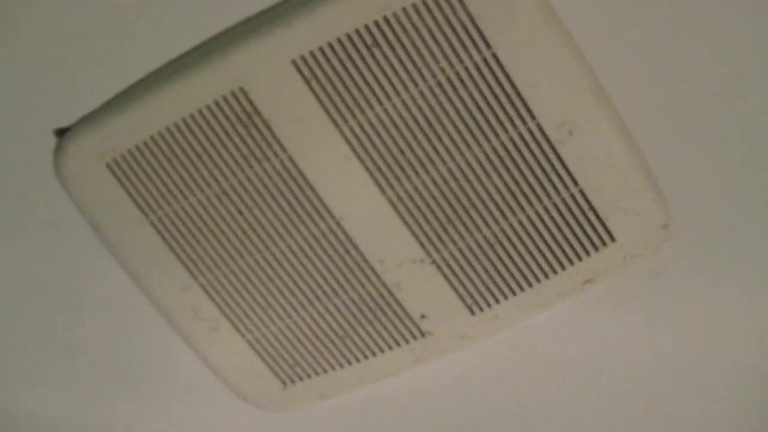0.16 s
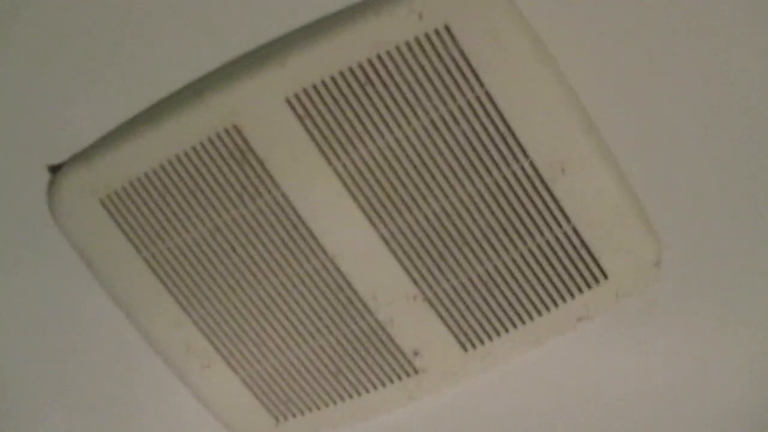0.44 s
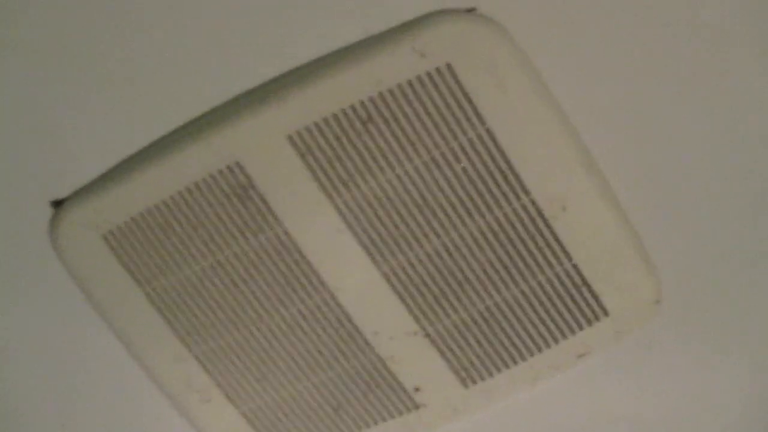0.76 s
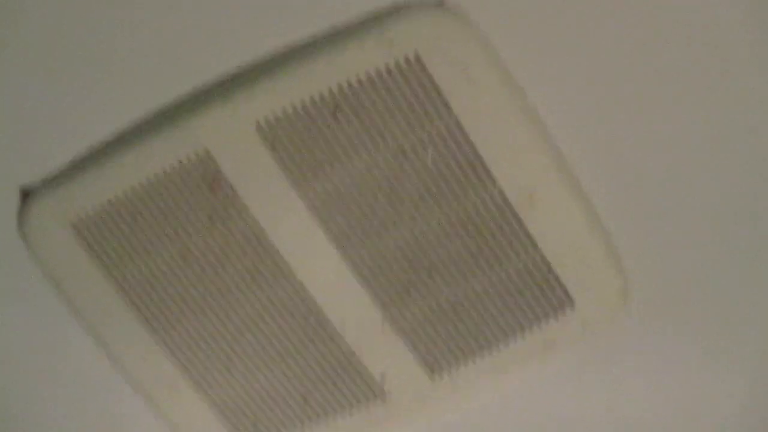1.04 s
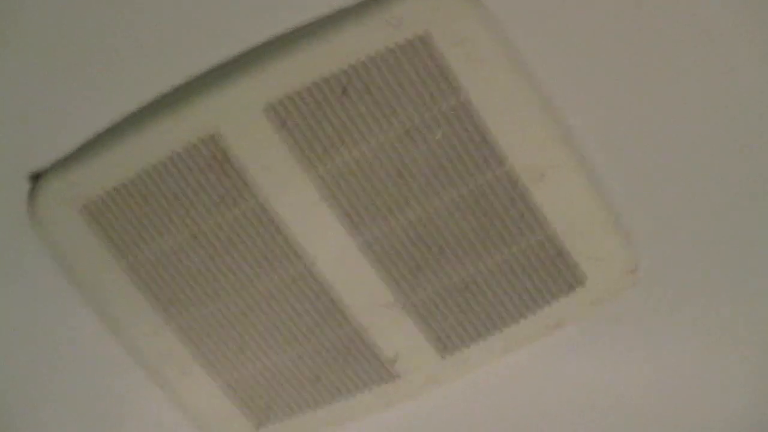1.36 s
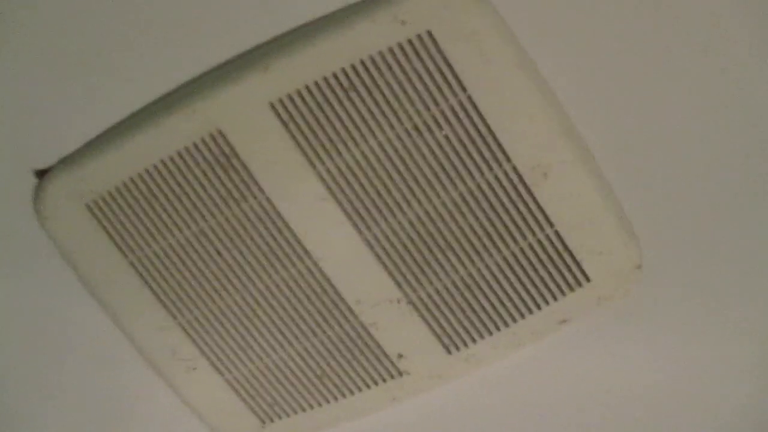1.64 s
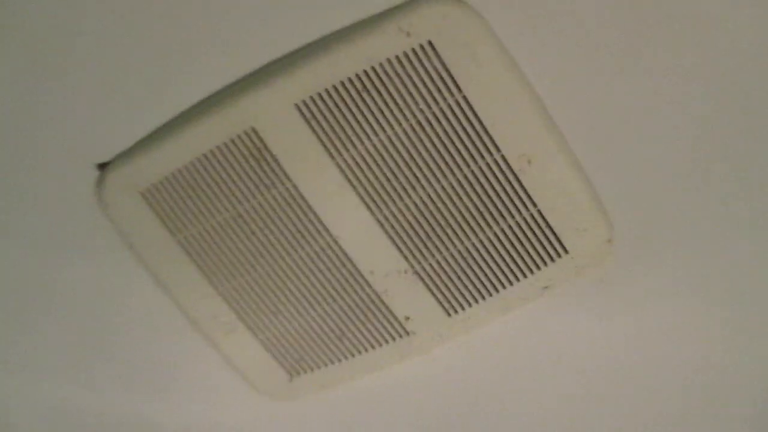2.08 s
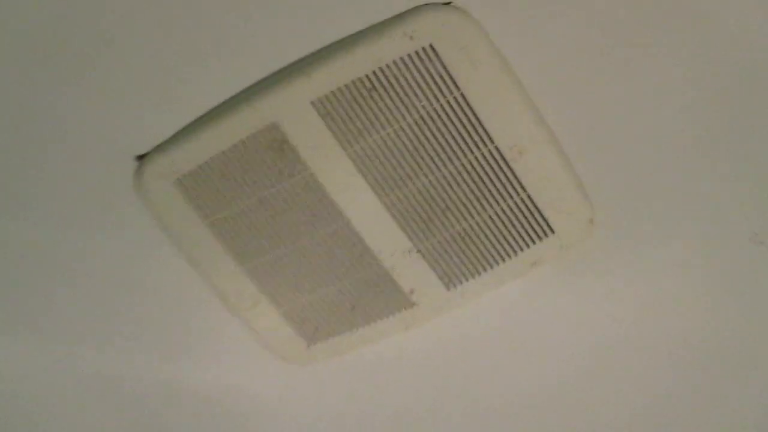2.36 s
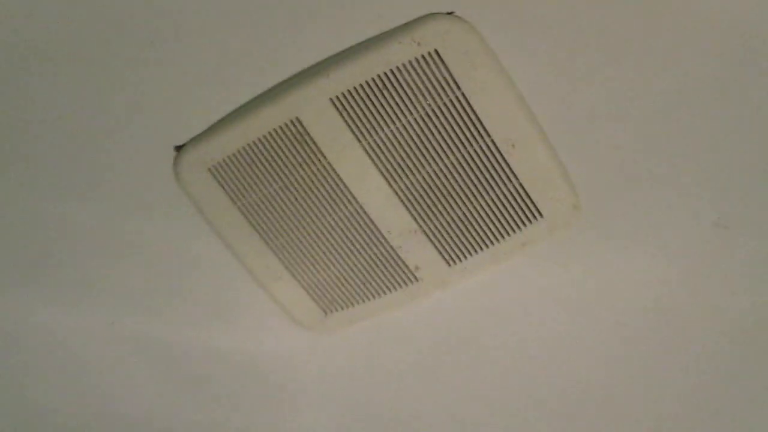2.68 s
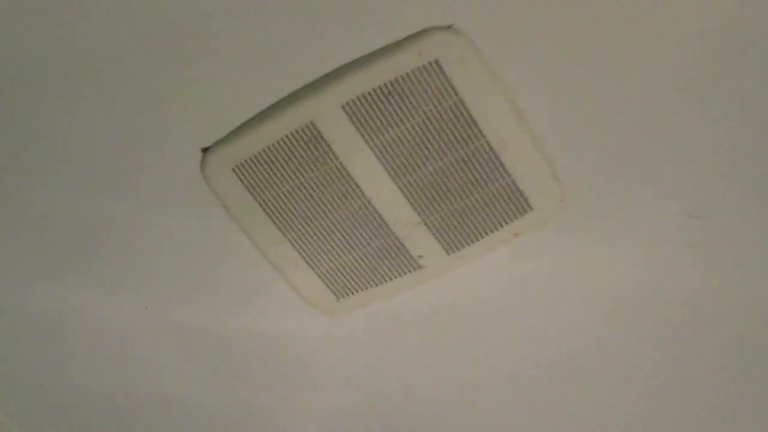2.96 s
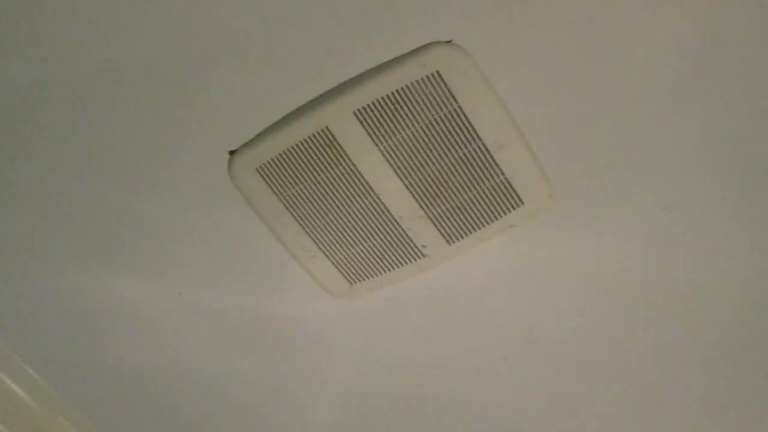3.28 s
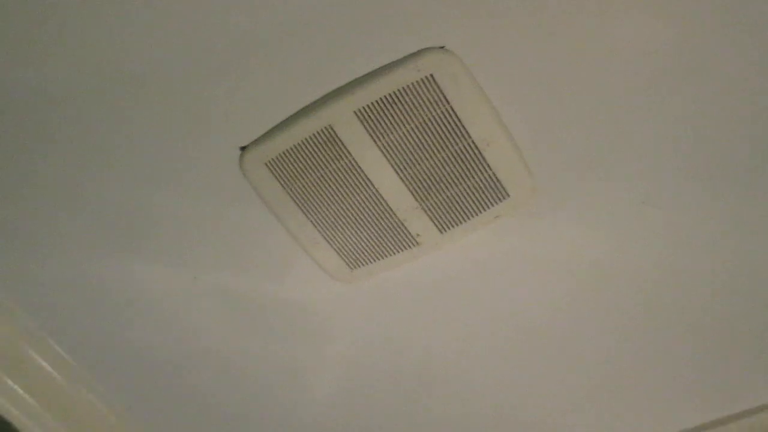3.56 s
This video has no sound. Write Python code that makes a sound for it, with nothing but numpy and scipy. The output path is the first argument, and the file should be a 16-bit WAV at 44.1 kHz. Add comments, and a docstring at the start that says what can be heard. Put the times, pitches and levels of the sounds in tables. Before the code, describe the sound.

A ceiling exhaust fan runs throughout in a small room: a strong low motor hum, a buzzing housing drone and throbbing air through the grille. Close up at first, it carries a thin ringing hiss. A faint tick at 1.1 s precedes a loud, dry plastic click at 1.25 s; the level ducks and slowly recovers. A soft rub follows at 1.35 s, small ticks around 1.55 s, and the hiss fades by about 2.2 s as the microphone retreats; the fan continues to the end near 3.7 s.

```python
"""A ceiling exhaust fan runs in a small room: its motor hums, and the turning wheel adds sidebands to the hum.
The housing drones as a cluster of steady tones, and air rushes through the grille as shaped, throbbing noise.
A hand-held microphone starts close, in a thin ringing hiss, and backs away.
Handling makes a few ticks, a soft rub and one sharp click of plastic modes, which ducks the gain;
the gain then recovers slowly."""
import sys
import numpy as np
from scipy import signal
from scipy.fft import rfft, irfft, next_fast_len
from scipy.io import wavfile
from scipy.ndimage import map_coordinates

SR = 44100
rng = np.random.default_rng(int(sys.argv[2]) if len(sys.argv) > 2 else 0)


def to_wav(s):
    """Save 16-bit WAV."""
    ch = np.atleast_2d(s).T  # columns
    pcm = np.round(np.clip(ch, -1, 1) * 32767)  # PCM
    wavfile.write(sys.argv[1], SR, pcm.astype(np.int16))


N = 164052

HUM_HZ, SHAFT_HZ = 119.93, 44.9  # fundamental of the magnetic hum, and the wheel's turns per second


def amp(db):
    """Level to amplitude ratio: 20 dB is a factor of ten."""
    return 10 ** (np.asarray(db) / 20)


def unit(x):
    """Normalisation to an rms value of 1."""
    return x / np.sqrt(np.mean(x ** 2))


def clock():
    """Sampled time: the instant of each sample in seconds."""
    return np.arange(N) / SR


def curve(rows):
    """Linear interpolation between (seconds, value) points."""
    return np.interp(clock(), *np.transpose(rows))


def wobble(rate):
    """Slow random modulation: a smooth curve through random knots, rate knots a second."""
    coarse = clock()[::64]
    knots = rng.standard_normal(256)
    smooth = map_coordinates(knots, [coarse * rate], mode="wrap")
    return np.interp(clock(), coarse, smooth)


def filtered(x, response):
    """Linear filtering: the spectrum of x times a response of frequency, zero-padded at the end."""
    m = next_fast_len(N + SR // 2)
    return irfft(rfft(x, m) * response(np.fft.rfftfreq(m, 1 / SR)), m)[:N]


def noise(spectrum):
    """Spectral shaping: white noise filtered to the given (Hz, dB per Hz) density."""
    f, db = np.transpose(spectrum)
    white = rng.standard_normal(N) * np.sqrt(SR / 2)  # unit power per Hz
    return filtered(white, lambda hz: amp(np.interp(np.log(hz + 1), np.log(f), db)))


def resonance(f, hz, width):
    """Resonance: the response of a damped oscillator, applied twice for steep skirts."""
    return (1j * f * width / (hz * hz - f * f + 1j * f * width)) ** 2


def ringing(hz, width):
    """Resonant excitation: noise in one resonance, of rms 1."""
    m = next_fast_len(N, real=True)
    white = rng.standard_normal(m)
    response = resonance(np.fft.rfftfreq(m, 1 / SR), hz, width)
    return unit(irfft(rfft(white, m) * response, m)[:N])


def reflections(x, ripple_db=2.3, spacing_hz=48):
    """Interference: reflections from close walls put fine, fixed peaks and dips into the treble."""
    knots = rng.standard_normal(4096)

    def response(f):
        depth_db = ripple_db * np.clip(f / 2000, 0, 1)  # full depth from 2 kHz up
        return amp(depth_db * map_coordinates(knots, [f / spacing_hz], mode="wrap"))
    return filtered(x, response)


THROB_HZ = 4.995  # the low rush nearly repeats at this rate
THROB_SHARE, THROB_TOP_HZ = 0.87, 1090  # share of one cycle returning in the next, and where that fades out


def throb(x):
    """Comb filtering: the low rush recurs every cycle and gathers into close, beating lines."""
    def response(f):
        share = THROB_SHARE * np.exp(-(f / THROB_TOP_HZ) ** 4)
        feedback = share * np.exp(-2j * np.pi * f / THROB_HZ)
        return np.sqrt(1 - share ** 2) / (1 - feedback)  # the root keeps the mean power
    return filtered(x, response)


# Air through the grille. Each row: frequency in Hz, density in dB per Hz before the air level is applied.
AIR_SPECTRUM = [(25.0, -74.0), (48.0, -71), (80.0, -58.5), (120.0, -48), (210.0, -54.5), (240.0, -59),
                (325.0, -54.5), (385.0, -51.5), (430.0, -62), (485.0, -62.5), (535.0, -55.5),
                (590.0, -56.5), (720.0, -55.5), (790.0, -62.5), (1000.0, -63), (1150.0, -60.5),
                (1400.0, -66.5), (1580.0, -66), (1750.0, -71), (2000.0, -69.5), (2500.0, -77.5),
                (3100.0, -79.5), (4900.0, -78.5), (5500.0, -82), (7100.0, -80.5), (7900.0, -83.5),
                (9200.0, -85), (11000.0, -88.5), (13000.0, -92.5), (15500.0, -99.0)]
# Level of that air. Each row: time in seconds, gain in dB.
AIR_LEVEL = [(0, -0.5), (1.2, -1), (1.7, -1.6), (2.5, -0.84), (3.3, -0.9), (3.7, -0.3)]
# Ringing hiss of the start. Each row: frequency in Hz, density in dB per Hz before the hiss level is applied.
HISS_SPECTRUM = [(500, -75), (750, -59), (1200, -64.5), (2200, -70), (3000, -77.5), (3330, -73.5),
                 (3880, -73.5), (4150, -93), (4650, -74.5), (4950, -71.5), (5250, -79), (6100, -81.5),
                 (6400, -97), (7000, -76.5), (8000, -103), (12000, -105)]
# Level of the hiss and its whines. Each row: time in seconds, gain in dB.
HISS_LEVEL = [(0, -1.5), (1.1, 0.5), (1.25, -0.5), (1.42, -8), (1.75, -9), (2.2, -25)]
# Narrow resonances of the air path. Each row: frequency in Hz, width in Hz, rms level in dB.
WHISTLES = [(727, 36, -42.5), (913, 11.6, -45.5), (1582, 20, -51), (1996, 95, -51.5), (4790, 380, -58),
            (7090, 220, -60), (9100, 350, -62.5), (10950, 200, -62), (13000, 150, -74)]
# Thin whines within the hiss. Each row: frequency in Hz, width in Hz, rms level in dB before the hiss level.
HISS_WHINES = [(3380, 78, -51), (3910, 63, -51), (4985, 87, -51.5), (6150, 70, -55)]


def air(flutter_db=0.59, flutter_rate=15, buzz_depth=0.032):
    """Amplitude modulation: flow noise and early hiss flutter together and pulse faintly with the hum."""
    whistles = sum(amp(db) * ringing(hz, width) for hz, width, db in WHISTLES)
    whines = sum(amp(db) * ringing(hz, width) for hz, width, db in HISS_WHINES)
    hiss_gain = amp(curve(HISS_LEVEL))
    flow = amp(curve(AIR_LEVEL)) * noise(AIR_SPECTRUM)
    rush = reflections(throb(flow + hiss_gain * noise(HISS_SPECTRUM)))
    pulsing = 1 + buzz_depth * np.sin(2 * np.pi * HUM_HZ * clock())
    flutter = amp(flutter_db * wobble(flutter_rate))
    return (rush + whistles + hiss_gain * whines) * pulsing * flutter


# Light handling ticks. Each row: start in seconds, level in dB, centre in Hz, width in octaves,
# time to decay by 60 dB in seconds.
TICKS = [(1.1005, -25, 3000, .8, 0.022), (1.1015, -27, 9500, .6, .011), (1.536, -35, 8500, .4, .012),
         (1.581, -25, 2900, .22, .02), (1.5815, -36, 8300, .1, .02), (1.583, -18, 1450, .3, 0.025),
         (1.584, -21, 2300, .2, .022), (1.6145, -38, 4000, .6, .01)]
# a soft rub after the click, perhaps of a hand
RUB_S, RUB_LENGTH_S, RUB_HZ, RUB_WIDTH_HZ, RUB_DB = 1.355, 0.044, 3900, 2100, -36


def ticks():
    """Transient excitation: each tick is a quickly dying burst in one band; the rub swells and fades."""
    rub_envelope = np.exp(-((clock() - RUB_S) / RUB_LENGTH_S) ** 2)
    out = ringing(RUB_HZ, RUB_WIDTH_HZ) * amp(RUB_DB) * rub_envelope
    t = np.arange(SR // 10) / SR
    f = np.fft.rfftfreq(len(t), 1 / SR) + 1  # 1 Hz up, so that the logarithm exists
    for s, db, hz, width_octaves, t60 in TICKS:
        band = np.exp(-.5 * (np.log2(f / hz) / width_octaves) ** 2)
        burst = unit(irfft(rfft(rng.standard_normal(len(t))) * band, len(t)))
        onset = 1 - np.exp(-2 * hz * t)
        decay = amp(db - 60 * t / t60)
        out[round(s * SR):][:len(t)] += burst * decay * onset
    return out


# Modes of the plastic. Each row: frequency in Hz, relative level in dB, time to decay by 60 dB in seconds.
PLASTIC_MODES = [(600, -8, .009), (1230, -11, .009), (2100, -6, 0.0087), (3120, 0, 0.011),
                 (4000, 2.5, 0.0069), (4600, -18, 0.0037), (7500, -2.5, 0.0027), (9500, -11, 0.0025)]
# Spectrum of the scrape. Each row: frequency in Hz, relative density in dB.
SCRAPE_SPECTRUM = [(300, -18), (600, -6), (1200, 0.5), (2100, 1.5), (3000, 3), (4000, 1), (5300, -9),
                   (7500, -7.5), (10000, -12), (12000, -27), (16000, -30)]
SNAP_S, SNAP_DB = 1.2504, 2.5  # time of the snap, and peak level of its ring
SCRAPE_S, SCRAPE_DB = .0085, -17  # the scrape starts this long before the snap
GAP_S = 0.00053  # short silent gap between the scrape and the snap


def click(crack_db=-14, crack_t60=0.0067):
    """Modal excitation: a plastic part scrapes, then snaps home with a crack and rings in its modes."""
    t = np.arange(SR // 20) / SR
    ring = sum(amp(db - 60 * t / t60) * np.sin(2 * np.pi * hz * t) for hz, db, t60 in PLASTIC_MODES)
    crack = ringing(5000, 6000)[:len(t)] * amp(crack_db - 60 * t / crack_t60)
    scraping = (clock() > SNAP_S - SCRAPE_S) & (clock() < SNAP_S - GAP_S)
    out = amp(SCRAPE_DB) * unit(noise(SCRAPE_SPECTRUM)) * scraping
    out[round(SNAP_S * SR):][:len(t)] += amp(SNAP_DB) * ring / np.abs(ring).max() + crack
    return out


# tones waver as the microphone moves through the room's standing waves
WAVER_DB_PER_KHZ, WAVER_RAD_PER_KHZ = 2.5, 1.0


def tone(hz, db, turn):
    """Standing waves: a tone from a fraction of a turn; the higher, the more level and phase waver."""
    t, khz = clock(), hz / 1000
    coarse = t[::256]
    swell, drift = (map_coordinates(knots, [5 * coarse], mode="wrap")
                    for knots in rng.standard_normal((2, 32)))
    phase = 2 * np.pi * (hz * t + turn) + np.interp(t, coarse, WAVER_RAD_PER_KHZ * khz * drift)
    peak = np.sqrt(2) * amp(db)  # db is the rms level
    level = peak * unit(amp(WAVER_DB_PER_KHZ * khz * swell))
    return np.interp(t, coarse, level) * np.sin(phase)


# Clear tones of the vibrating housing. Each row: frequency in Hz, rms level in dB before the housing level.
HOUSING_TONES = [(144.5, -46), (215.3, -37.5), (264.4, -42.5), (384.3, -38.5), (530.3, -43), (534.4, -40.5),
                 (620, -44), (669, -44.5), (714, -40), (729.3, -43.5), (740, -45), (819.2, -45.5),
                 (839.5, -49), (909, -49.5), (953.9, -59), (1199.4, -48)]
# Level of all housing tones, stronger close by. Each row: time in seconds, gain in dB.
HOUSING_LEVEL = [(0, 3), (1.1, 2), (1.6, -1), (2.6, 0), (3.7, -2)]
BUZZ_DB, BUZZ_BAND_HZ = -53, (290, 1150)  # each faint tone before the housing level, and their range


def housing():
    """Superposition: the vibrating housing sounds a few clear tones among many faint ones."""
    faint = sum(tone(hz, BUZZ_DB, rng.random()) for hz in rng.uniform(*BUZZ_BAND_HZ, size=24))
    clear = sum(tone(hz, db, rng.random()) for hz, db in HOUSING_TONES)
    return amp(curve(HOUSING_LEVEL)) * (faint + clear)


# Hum and its sidebands. Each row is one multiple of the hum, from the first: levels in dB at two shaft rates
# below it, one below, the multiple itself, one above and two above.
SIDEBANDS = [(-61, -34, -14.5, -28.5, -29), (-48, -31.5, -40.5, -43.5, -40.5),
             (-38.5, -45, -37.5, -52, -44), (-29, -66, -48, -40.5, -52), (-45.5, -53, -41, -49, -51),
             (-45, -67, -39.5, -56, -51)]
# Orders of the wheel. Its entries: level in dB of the second, third and fourth multiple of the shaft rate.
SHAFT_ORDERS = [-35, -44.5, -38]


def motor():
    """Phase modulation: the wheel gives each multiple of the magnetic hum sidebands, and adds its own orders."""
    out = sum(tone(k * SHAFT_HZ, db, rng.random()) for k, db in enumerate(SHAFT_ORDERS, 2))
    for k, row in enumerate(SIDEBANDS, 1):
        hum_turn, shaft_turn = rng.random(2)
        for j, db in enumerate(row, -2):
            turn = hum_turn + j * shaft_turn + abs(j) / 4  # a quarter turn per sideband order
            out += tone(k * HUM_HZ + j * SHAFT_HZ, db, turn)
    return out


def scene():
    """Superposition: the fan and the handling add up in one channel."""
    return (air() + ticks() + click() + housing() + motor())[None]


CEILING_DB, ATTACK_S = -6.5, 0.001  # threshold and attack of the gain control
HOLD_S, RELEASE_DB_PER_S = 0.1, 4.8  # its hold and recovery
TOP_HZ = 15720  # upper band limit


def record(dry):
    """Dynamic limiting: gain ducks on sharp peaks, holds and recovers slowly; then clipping and a band limit."""
    x, t = dry[0], clock()
    presence = filtered(x, lambda hz: (hz > 1500) & (hz < 5500))  # the band that steers the gain
    over_db = np.maximum(20 * np.log10(np.abs(presence) + 1e-9) - CEILING_DB, 0)
    # each peak falls off along a straight line in dB
    falling = np.maximum.accumulate(over_db + RELEASE_DB_PER_S * t) - RELEASE_DB_PER_S * t
    duck_db = np.maximum(falling, np.interp(t - HOLD_S, t, falling))
    pole = np.exp(-1 / (ATTACK_S * SR))
    smooth_duck_db = signal.lfilter([1 - pole], [1, -pole], duck_db)
    ducked = x * amp(-smooth_duck_db)
    return filtered(np.clip(ducked, -1, 1), lambda hz: hz < TOP_HZ)[None]


dry = scene()
out = record(dry)
to_wav(out)
```